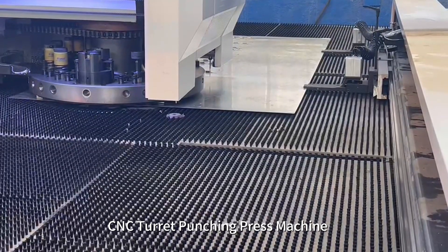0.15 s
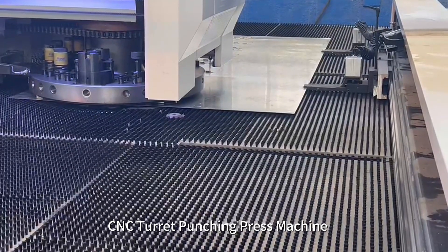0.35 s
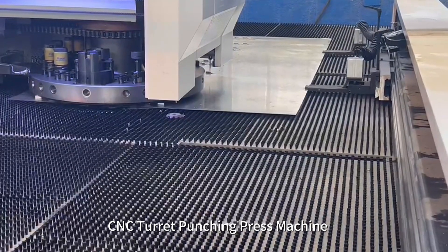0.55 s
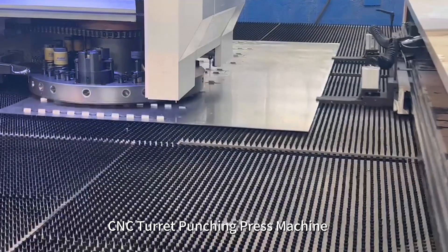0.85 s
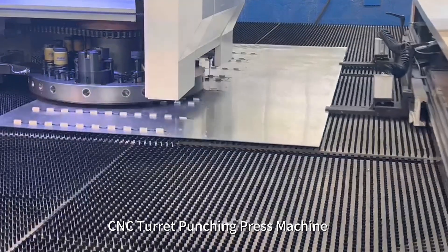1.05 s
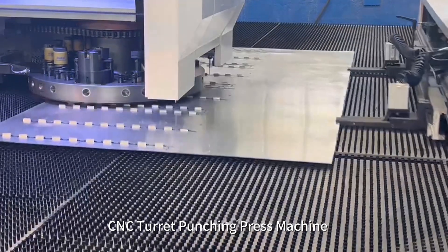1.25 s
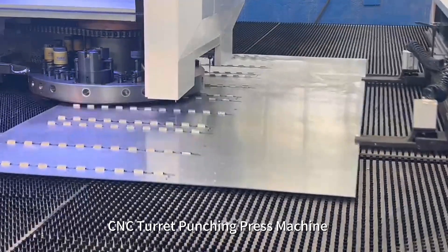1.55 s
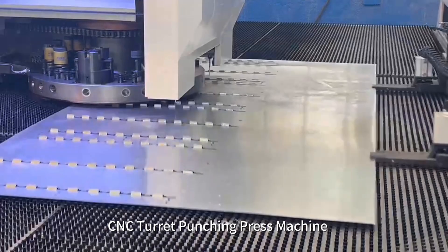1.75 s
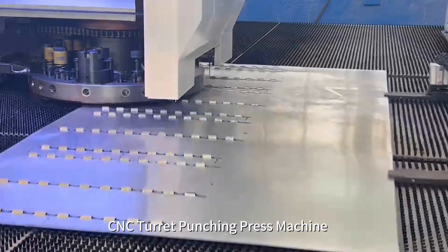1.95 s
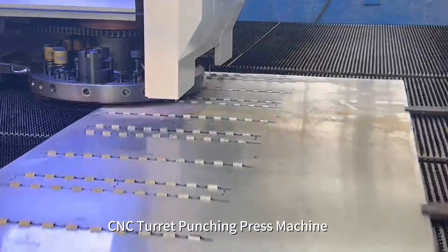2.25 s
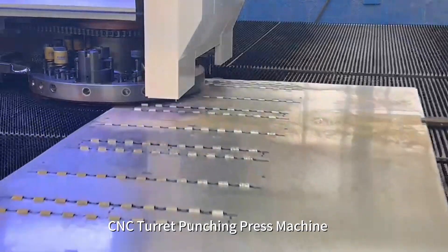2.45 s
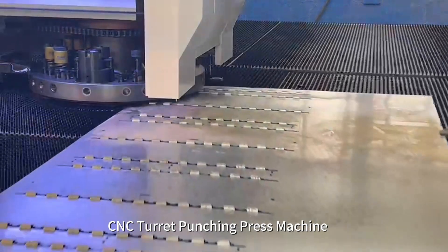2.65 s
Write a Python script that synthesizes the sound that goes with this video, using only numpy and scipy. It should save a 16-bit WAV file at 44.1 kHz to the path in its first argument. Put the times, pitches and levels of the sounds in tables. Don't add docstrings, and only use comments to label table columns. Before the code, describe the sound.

A steel sheet drags with a hollow metallic roar across a punch press table after a sharp clank

```python
import sys
import numpy as np
from scipy import signal
from scipy.fft import rfft, irfft, next_fast_len
from scipy.io import wavfile
from scipy.ndimage import uniform_filter1d

SR = 44100
rng = np.random.default_rng(int(sys.argv[2]) if len(sys.argv) > 2 else 0)


def invert_db(level):
    return 10 ** (np.asarray(level, dtype=float) / 20)


def pcm_store(signal):
    levels = np.round(np.clip(np.atleast_2d(signal), -1, 1) * 32767)
    wavfile.write(sys.argv[1], SR, levels.astype(np.int16).T)


N = 123479


def read(points, hz):
    f, value = np.transpose(points)
    return np.interp(np.log(hz + 1), np.log(f + 1), value)


def evened(x):
    return x / np.sqrt(np.mean(x ** 2) + 1e-20)


def colour(x, points):
    size = next_fast_len(len(x))
    gain = invert_db(read(points, np.fft.rfftfreq(size, 1 / SR)))
    return evened(irfft(rfft(x, size) * gain, size)[:len(x)])


def resonate(x, hz, *widths_hz):
    turn = np.exp(2j * np.pi * np.cumsum(hz * np.ones(len(x))) / SR)
    x = x * turn.conj()
    for r in np.exp(-np.pi * np.abs(widths_hz) / SR):
        x = signal.lfilter([1 - r], [1, -r], x)
    return 2 * (turn * x).real


def wander(rate_hz):
    noise = rng.standard_normal(N + SR)
    return evened(signal.lfilter(*signal.butter(2, rate_hz, fs=SR), noise)[SR:])


def grit(per_s, spread_db):
    hits = rng.random(N) < per_s / SR
    size_db = spread_db * np.minimum(rng.exponential(1, N), 4)
    return hits * rng.standard_normal(N) * invert_db(size_db)


# frequency in Hz, level in dB.
MOTOR_TONES = [(48.4, -37), (317.6, -34.5), (403.7, -45), (640.6, -52), (888.2, -47), (1400, -57),
               (2239, -65), (3521, -69), (3768, -74), (4161, -68), (4802, -72.5), (6002, -64.5)]
# frequency in Hz, level in dB per Hz.
FLOOR_SPECTRUM = [(55, 4.5), (320, -10), (900, -23), (1150, -31), (1500, -24.5), (3300, -38), (6000, -45),
                  (14000, -49)]
# time in seconds, level in dB.
SERVO_WHINE = [
    (.465, -75),
    (.472, -44),
    (.488, -50),
    (.5, -66),
    (.54, -68),
    (.546, -45),
    (.565, -54),
    (.585, -49),
    (.62, -66),
    (.7, -90),
]


def idle():
    t = np.arange(N) / SR
    tones = 0
    for hz, db in MOTOR_TONES:
        level = np.sqrt(2) * invert_db(db + 0.5 * wander(34))
        tones = tones + level * np.sin(2 * np.pi * (hz * t + 0.066 * wander(10.0)))
    whine_level = np.sqrt(2) * invert_db(np.interp(t, *np.transpose(SERVO_WHINE)))
    whine = whine_level * np.sin(2 * np.pi * (6080 * t + 0.27 * wander(60)))
    return tones + whine + invert_db(-30.5) * colour(rng.standard_normal(N), FLOOR_SPECTRUM)


# time in seconds, level in dB.
BED_BOOM = [
    (.31, -66),
    (.33, -23),
    (.39, -32),
    (.44, -15),
    (.51, -22),
    (.55, -23),
    (.66, -28.5),
    (.9, -38),
    (1.05, -49),
]


def boom():
    t = np.arange(N) / SR
    level = np.sqrt(2) * invert_db(np.interp(t, *np.transpose(BED_BOOM)) + 4.4 * wander(15))
    return level * np.sin(2 * np.pi * (79 * t + 0.14 * wander(4.5)))


def plate(x, t60_s=0.092, ring_db=-3, turn_s=0.3977):
    t, span = np.arange(SR // 4) / SR, round(turn_s * SR)
    tails = rng.standard_normal((8, SR // 4)) * invert_db(-60 * t / t60_s)
    rung = np.zeros(N + SR)
    for k, tail in enumerate(tails):
        at = np.arange(max((k - 1) * span, 0), min((k + 1) * span, N))
        if len(at):
            faded = x[at] * np.cos(np.pi / 2 * (at / span - k))
            rung[at[0]:][:len(at) + len(t) - 1] += signal.oaconvolve(faded, tail)
    return evened(x + invert_db(ring_db) * evened(rung[:N]))


# time in seconds, roar level in dB, bristle hiss level in dB,
# main sheet mode in Hz, lift of the high modes in dB.
SHEET_TRAVEL = [(.33, -16.5, -40, 334, -11), (.42, -18.5, -36, 327, -8), (.53, -21, -44, 312, -24),
                (.58, -22.5, -49, 303, -12), (.62, -21.5, -41.5, 298, -4), (.7, -16.5, -39.5, 315, -24),
                (.95, -15.5, -37.5, 335, 9.5), (1.15, -14, -37, 323, -17), (1.36, -16, -37, 325, -5),
                (1.55, -16.5, -38, 366, 4), (1.85, -17.5, -35.5, 367, 6), (2.05, -16, -34, 360, 6),
                (2.25, -20, -36, 379, 8), (2.55, -19.5, -34, 347, 3), (2.672, -20.5, -34.5, 385, 2),
                (2.78, -25, -52.5, 355, -14), (2.8, -22, -44, 382, 3)]
# frequency in Hz, level in dB per Hz.
ROAR_SPECTRUM = [(30, -40), (60, -14), (176, 0.5), (380, -3.5), (620, -9), (950, -12.5), (2200, -17),
                 (2700, -25.5), (3400, -40)]
# frequency in Hz, level in dB per Hz.
HISS_SPECTRUM = [(2000, -10), (2900, 1.5), (5000, 1), (7800, -7.5), (9300, -16), (10500, -5.5), (13000, -3),
                 (14200, -7)]
# frequency in Hz, width in Hz, level in dB.
SHEET_MODES = [(68.6, 8.4, -21.5), (138, 14, -26), (180.2, 25, -8.5), (250.3, 11, -15.5),
               (452.5, 18, -12.5), (515, 17, -14.5), (715, 23, -21), (873, 16, -21.5), (1265, 100, -15.5),
               (1739, 33, -20), (1780, 74, -34), (2130, 51, -16), (2132, 16, -32), (2340, 29, -45)]


def travel():
    t = np.arange(N) / SR
    s, roar_db, hiss_db, main_hz, lift_db = np.transpose(SHEET_TRAVEL)
    on = np.clip((t - 0.312) / 0.031, 0, 1)
    lift_db = np.interp(t, s, lift_db)
    swell_db = 1.3
    modes = 0
    for hz, width_hz, db in SHEET_MODES:
        db = db + lift_db * (hz > 1500) + swell_db * wander(1.5)
        hz = hz * (1 + 0.004 * wander(4.8))
        modes = modes + invert_db(db) * evened(resonate(rng.standard_normal(N), hz, width_hz, 3 * width_hz))
    main = evened(resonate(rng.standard_normal(N), np.interp(t, s, main_hz), 44, 50))
    main = main * invert_db(-5 + swell_db * wander(3.4))
    broad = plate(colour(grit(per_s=4000, spread_db=2.28), ROAR_SPECTRUM)) * invert_db(0.13 * wander(17.0))
    roar = evened(modes + main + invert_db(5.5) * broad)
    hiss = plate(colour(grit(per_s=9000, spread_db=2), [(1200, -50)] + HISS_SPECTRUM))
    hiss = hiss * invert_db(1.4 * wander(33))
    screw = invert_db(-60) * np.sin(2 * np.pi * 7806 * t)
    return on * (screw + roar * invert_db(np.interp(t, s, roar_db)) + hiss * invert_db(np.interp(t, s, hiss_db)))


# start in seconds, crack level in dB, frame thud level in dB,
# crack t60 in seconds, brightness in dB per octave.
MACHINE_KNOCKS = [(0.3207, -14, -45, 0.043, -0.5), (.327, -24.5, -35, .05, 2),
                  (.334, -20.5, -15.5, 0.071, -4.5), (.343, -20.5, -34, 0.05, -1.5),
                  (0.365, -21, -30, .06, -8), (0.353, -18, -18.5, 0.12, -3.5), (0.371, -24, -25, 0.098, 6),
                  (.384, -22.5, -18, 0.069, 6), (0.398, -15, -32, 0.062, -6.5),
                  (0.411, -22.5, -17.5, 0.061, -3.5), (0.6217, -47, -18, 0.054, 1.6),
                  (0.674, -39.5, -25, .1, -.5), (0.784, -38, -35, 0.053, 0), (0.952, -29, -24, 0.11, -5),
                  (1.067, -32, -43, 0.053, 2), (1.75, -29, -31, 0.08, 3), (2.0392, -22.5, -37, 0.094, 5),
                  (2.047, -22, -32, 0.1, 5), (2.063, -20.5, -36, 0.19, -1.5), (2.3657, -24, -49, 0.13, 2),
                  (2.465, -31, -29, 0.084, -6), (2.5588, -21.5, -26, 0.064, -0.7),
                  (2.652, -24.5, -18, 0.12, -3.5), (2.795, -25.5, -16, 0.12, 1.5)]
# frequency in Hz, level in dB.
CRACK_SPECTRUM = [(200, -2.5), (400, -8), (900, 0.5), (1640, 0), (2580, 0), (7000, -11.5), (10500, -15),
                  (14300, -11)]
# frequency in Hz, level in dB, t60 in seconds.
FRAME_MODES = [(162.4, -2.5, 0.18), (234.5, -1, 0.3), (312, -9, 0.14), (392, 6.5, 0.057), (737, 6, 0.023),
               (897, 7, 0.026)]


def knocks():
    out, t = np.zeros(N + SR), np.arange(SR // 2) / SR
    rattle = invert_db(2.46 * wander(300))
    for s, crack_db, thud_db, t60, tilt_db in MACHINE_KNOCKS:
        tilted = [(hz, db + tilt_db * np.log2(min(hz, 5000) / 1000)) for hz, db in CRACK_SPECTRUM]
        softness_db = 3.2 * (-17 - crack_db - max(tilt_db, 0))
        rise_s = min(0.0003 * invert_db(softness_db), 0.009)
        crack = colour(rng.standard_normal(len(t)), tilted) * np.minimum(t / rise_s, 1)
        crack *= rattle[round(s * SR) // 2:][:len(t)]
        tail = invert_db(-17 - 60 * t / 0.45) * np.minimum(t / 0.005, 1) * (1 - t / t[-1])
        crack *= invert_db(-60 * t / t60) + tail
        thud = 0
        for hz, db, ring_s in FRAME_MODES:
            level = invert_db(db + 0.57 * rng.standard_normal() - 60 * t / ring_s)
            thud = thud + level * np.sin(2 * np.pi * hz * t)
        thud = thud * np.minimum(t / 0.0053, 1)
        out[round(s * SR):][:len(t)] += invert_db(crack_db) * crack + invert_db(thud_db) * thud
    return out[:N]


# start in seconds, length in seconds,
# frequency in Hz, level in dB.
MODE_SURGES = [(0.897, 0.14, 232, -26), (1.103, 0.13, 232, -26), (1.495, 0.12, 215, -24),
               (2.448, 0.065, 260, -25.5), (0.337, 0.065, 175, -21), (0.402, 0.033, 200.5, -21),
               (0.403, .1, 886, -34), (0.605, 0.099, 1480, -35), (0.613, 0.081, 1865, -32.5),
               (.55, 0.53, 999, -36), (1.385, 0.14, 138, -24.5), (2.04, 0.28, 75.7, -27.5),
               (2.297, 0.13, 80, -33.5), (2.605, 0.22, 168.8, -25), (0.503, 0.13, 167.4, -25),
               (0.653, .15, 312, -18), (0.736, 0.25, 872, -29.5), (0.758, 0.11, 1247, -30),
               (0.825, 0.22, 322, -26), (0.87, 0.044, 177.2, -23), (0.94, 0.044, 1270, -27.5),
               (.98, .13, 715, -25.5), (1.02, 0.094, 170, -22.5), (1.034, 0.041, 1310, -25),
               (1.055, 0.17, 338.8, -23.5), (1.135, 0.088, 172, -19), (1.155, 0.12, 1268, -26),
               (1.17, 0.044, 713, -27.5), (1.249, 0.048, 181.2, -20), (1.26, .13, 312.7, -18.5),
               (1.366, 0.052, 716, -30), (1.4, .11, 1265, -28.5), (1.512, 0.3, 354.8, -21),
               (1.737, 0.068, 1251, -31), (1.762, 0.18, 355.6, -20), (1.927, 0.11, 356, -17.5),
               (1.724, 0.088, 175, -26), (1.774, 0.28, 2120, -36.5), (1.82, 0.13, 506.6, -30),
               (2.046, 0.085, 345.2, -19), (2.08, 0.06, 152, -20), (1.904, 0.17, 182, -24),
               (2.034, 0.13, 1296, -34), (2.14, 0.46, 2213, -35.5), (2.28, 0.19, 348, -23.5),
               (2.227, 0.19, 509.5, -27.5), (2.351, 0.11, 189.2, -25.5), (2.45, 0.16, 353, -20),
               (2.61, 0.13, 360.4, -21.5)]


def surges():
    out = np.zeros(N + SR)
    shake, sway = invert_db(2.5 * wander(32)), 0.11 * wander(15.9)
    for s, length, hz, db in MODE_SURGES:
        at = np.arange(round(s * SR), min(round((s + length) * SR), N))
        swell = np.sin(np.pi * (at - at[0]) / len(at)) ** 0.43
        own = (at + round(hz) * 9) % N
        cycles = hz * at / SR + np.sqrt(hz / 350) * sway[own]
        out[at] += invert_db(db) * swell * shake[own] * np.sin(2 * np.pi * cycles)
    return np.sqrt(2) * out[:N]


def scene():
    return (idle() + boom() + travel() + knocks() + surges())[None]


def limiter(x, limit_db=-20, share=0.3, ceiling=0.9):
    power_db = 10 * np.log10(abs(uniform_filter1d(x ** 2, size=900, origin=400)) + 1e-12)
    excess_db = uniform_filter1d(np.maximum(power_db - limit_db, 0), size=400, origin=150)
    x = x / invert_db(share * excess_db)
    return ceiling * np.tanh(x / ceiling)


# frequency in Hz, threshold in dB against neighbouring bands.
GATE_THRESHOLD = [(800, -11), (1200, -8), (1600, -5.5), (2500, -5), (3300, -2.5), (4300, -3.5), (6000, -5),
                  (7900, -3.5), (8900, -6), (9600, -30)]


def band_gate(hz, z):
    bands = (abs(z[:1024]) ** 2).reshape(128, 8, -1).mean(axis=1)
    level_db = 10 * np.log10(abs(uniform_filter1d(bands, size=3, axis=1)) + 1e-20)
    whim_db = 2.4 * evened(uniform_filter1d(rng.standard_normal(bands.shape), size=4, axis=1))
    contrast_db = level_db - uniform_filter1d(level_db, size=9, axis=0)
    margin_db = contrast_db + whim_db - read(GATE_THRESHOLD, hz[4:1024:8])[:, None]
    gate = np.repeat(np.clip(3 * margin_db, 0.005, 1), 8, axis=0)[np.minimum(np.arange(len(hz)), 1023)]
    top_db = level_db[16:46].mean(axis=0)
    gate[:, abs(np.roll(top_db, -2) - np.roll(top_db, 2)) > 10] = 1
    return gate


def microphone(hz):
    notch_db = -60 / (1 + ((hz - 8500) / 250) ** 4)
    edge_db = -45 * (hz > 14130)
    return invert_db(notch_db + edge_db) / (1 + (40 / (hz + 1)) ** 3)


def roll_off(x):
    return signal.sosfilt(signal.butter(12, 14970, fs=SR, output="sos"), x)


def record(dry):
    hz, _, z = signal.stft(limiter(dry[0]), SR, nperseg=2048, noverlap=1536)
    z = z * band_gate(hz, z) * microphone(hz)[:, None]
    heard = signal.istft(z, SR, nperseg=2048, noverlap=1536)[1]
    return roll_off(heard[None, :N])


dry = scene()
out = record(dry)
pcm_store(out)
```